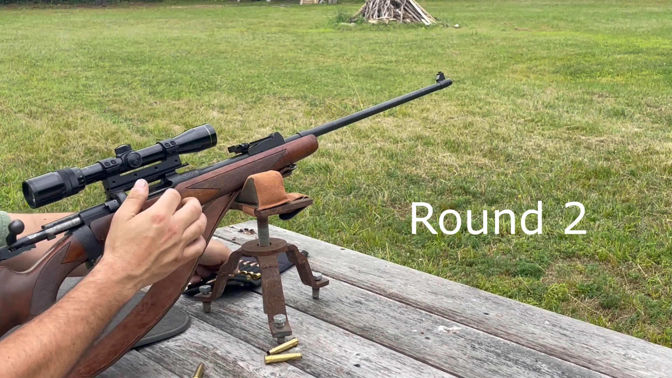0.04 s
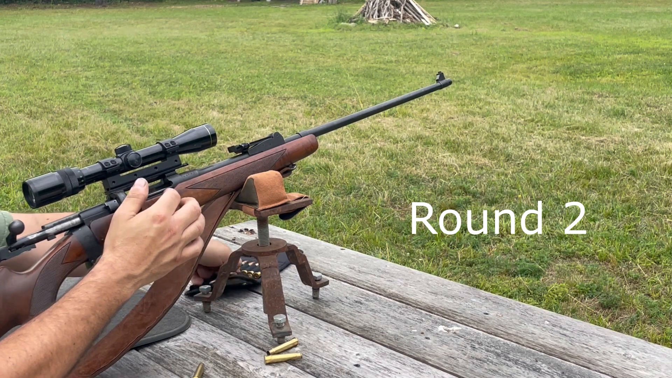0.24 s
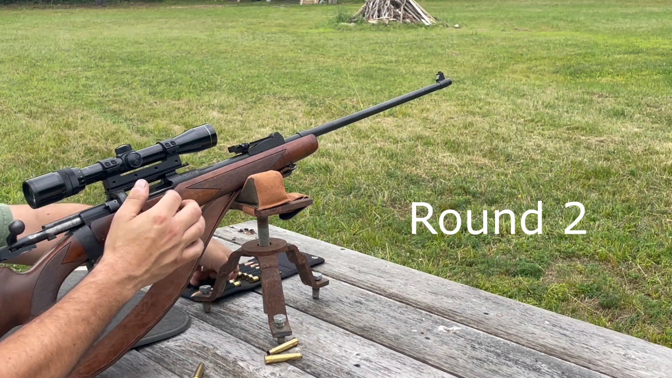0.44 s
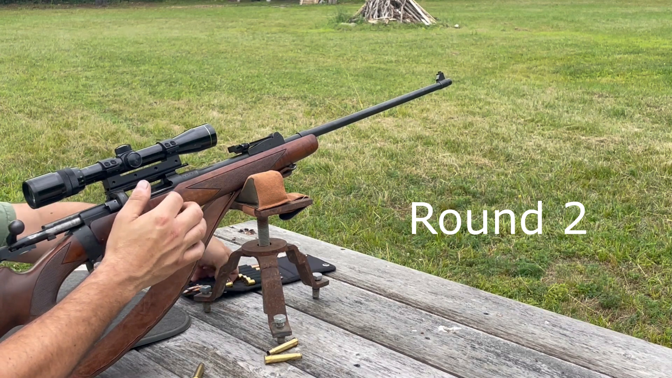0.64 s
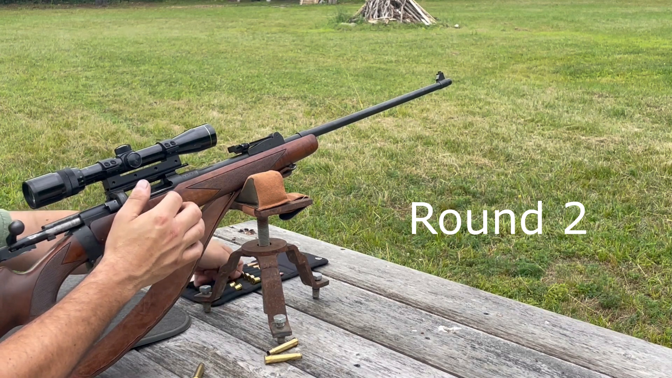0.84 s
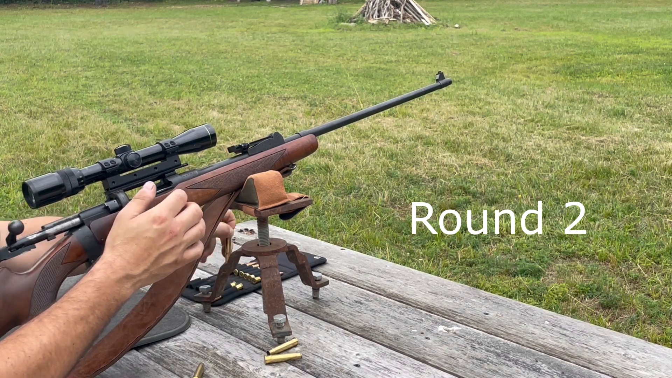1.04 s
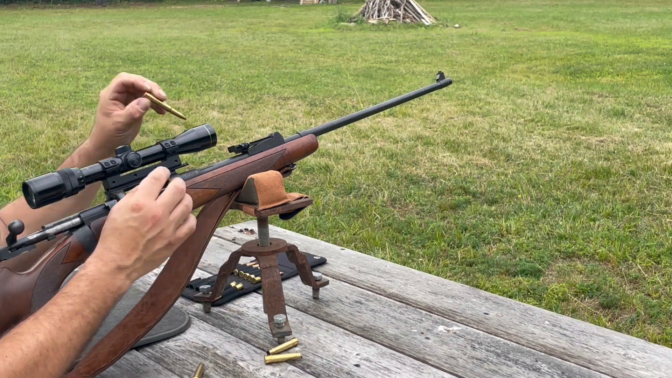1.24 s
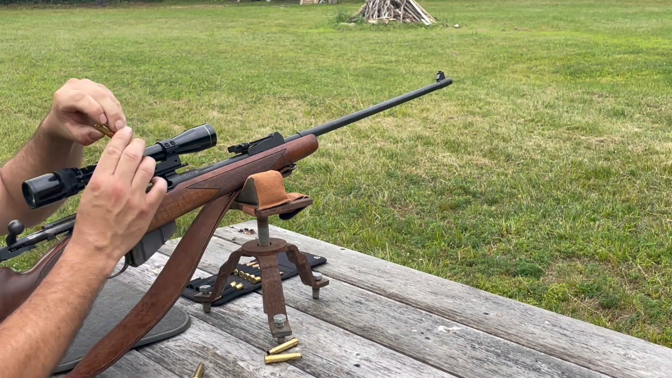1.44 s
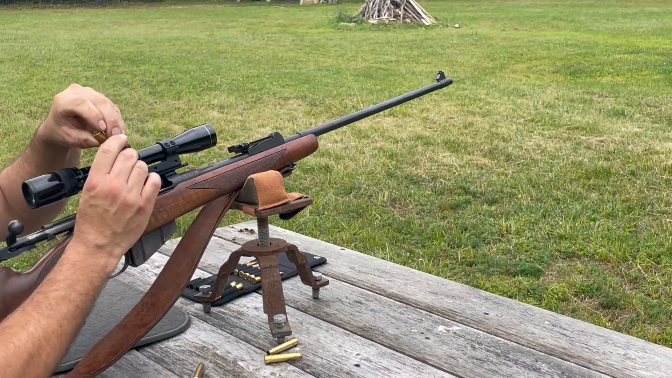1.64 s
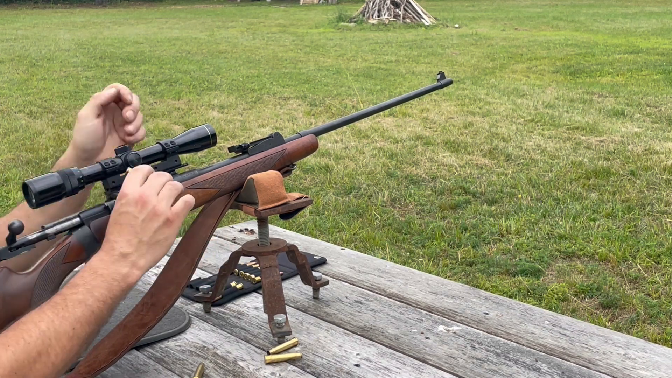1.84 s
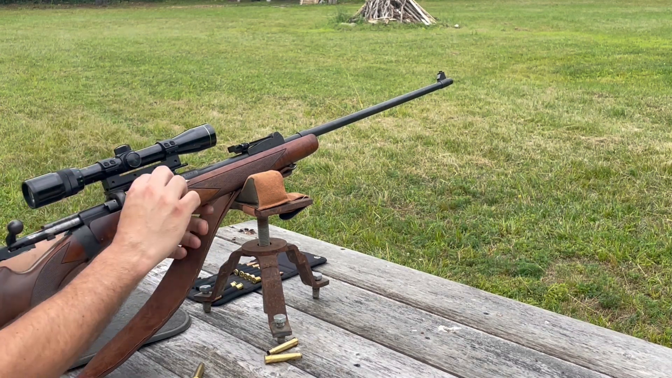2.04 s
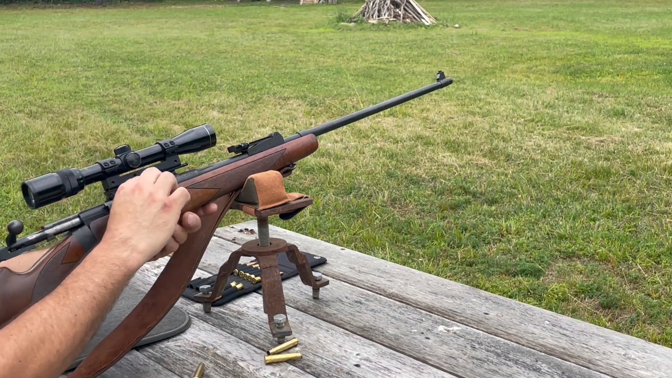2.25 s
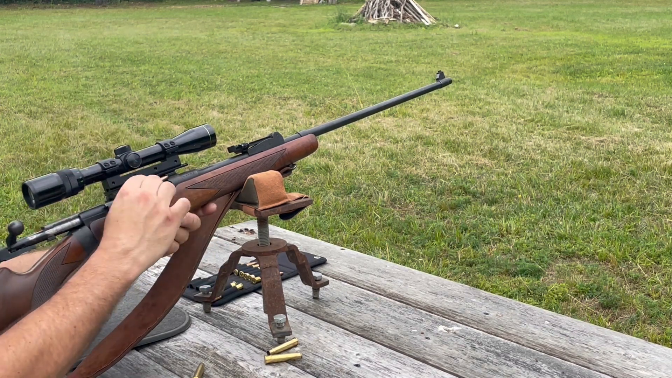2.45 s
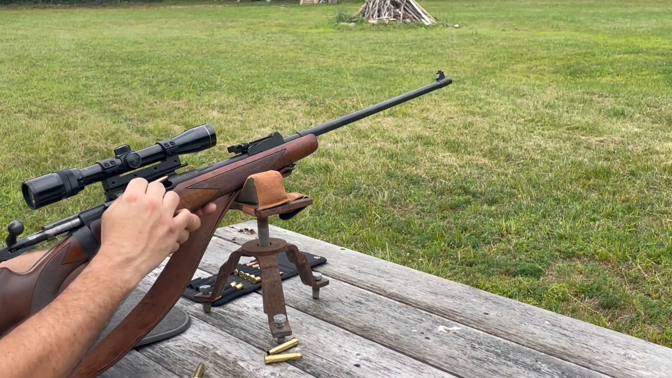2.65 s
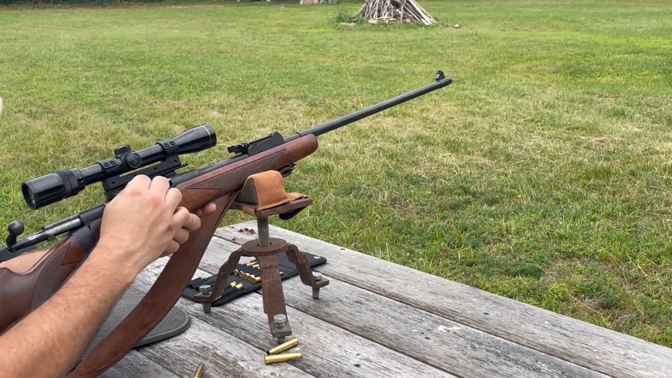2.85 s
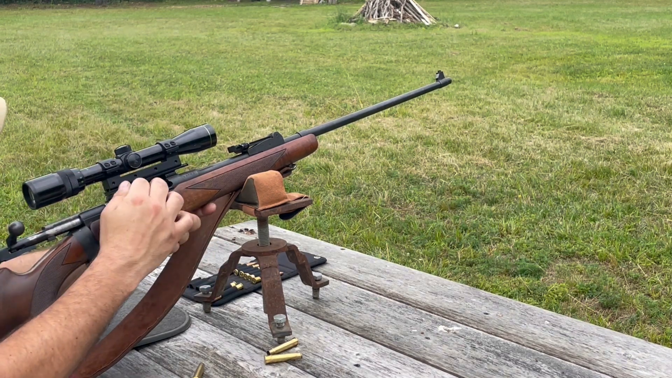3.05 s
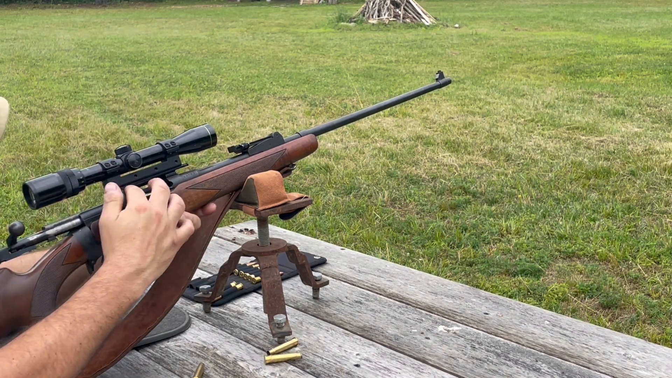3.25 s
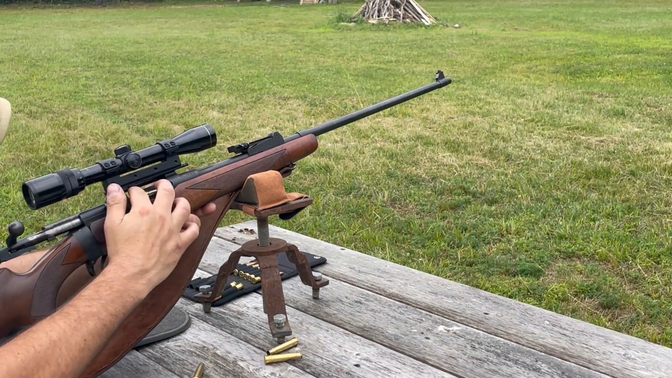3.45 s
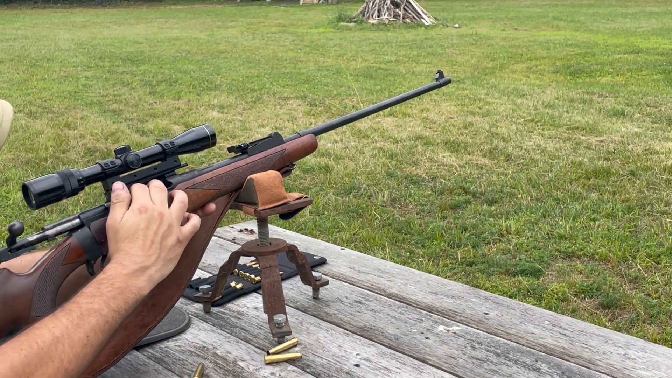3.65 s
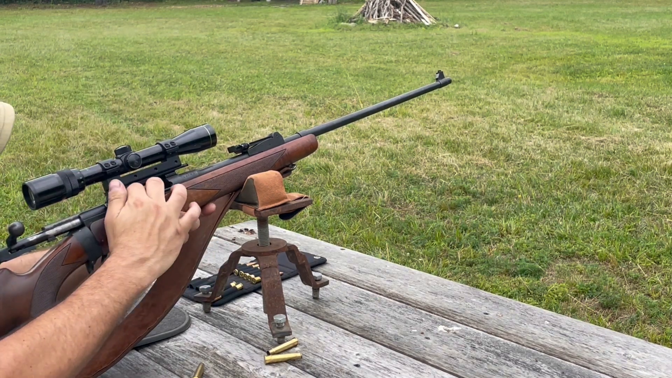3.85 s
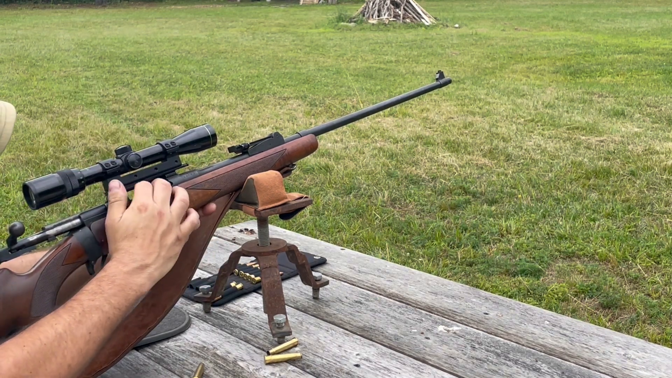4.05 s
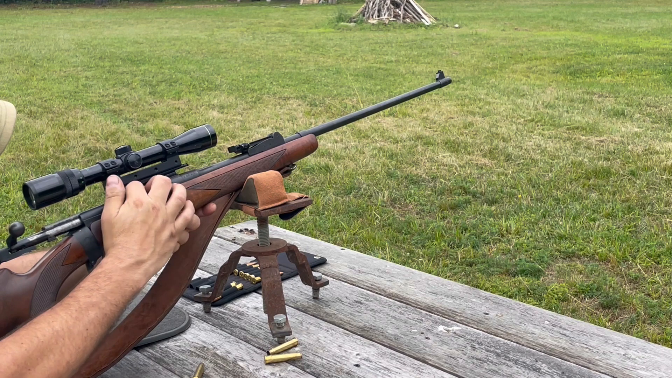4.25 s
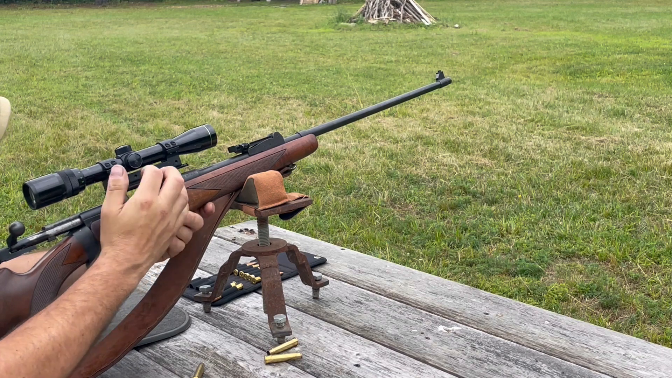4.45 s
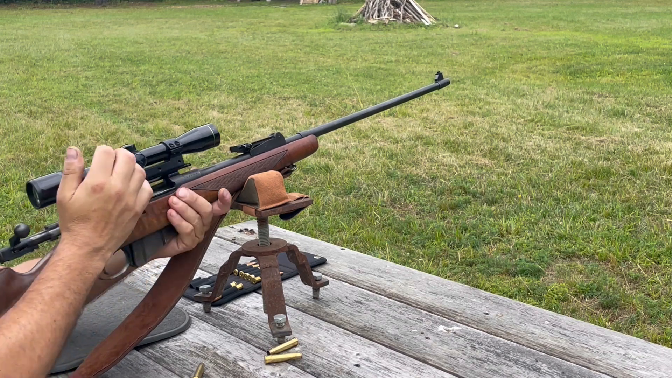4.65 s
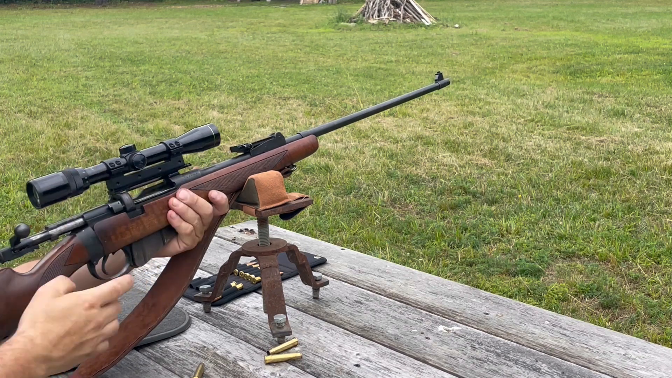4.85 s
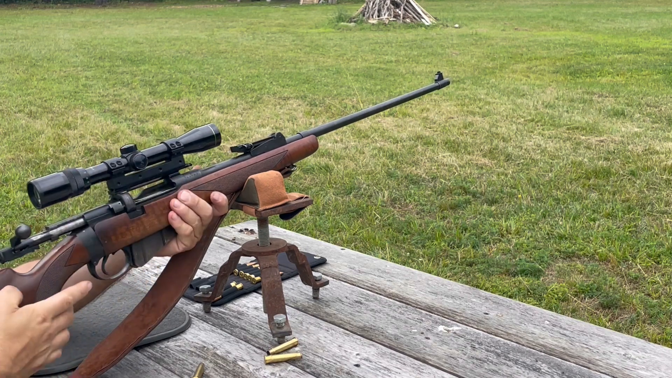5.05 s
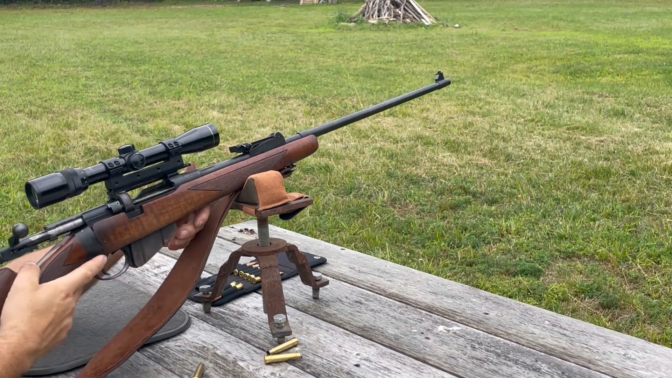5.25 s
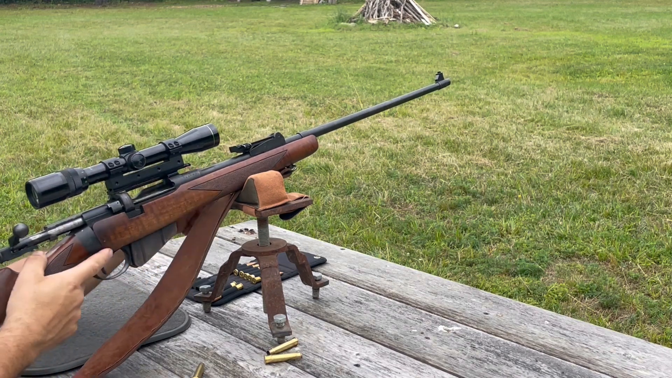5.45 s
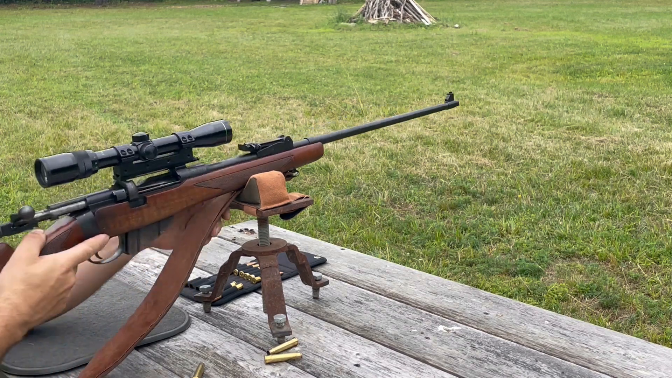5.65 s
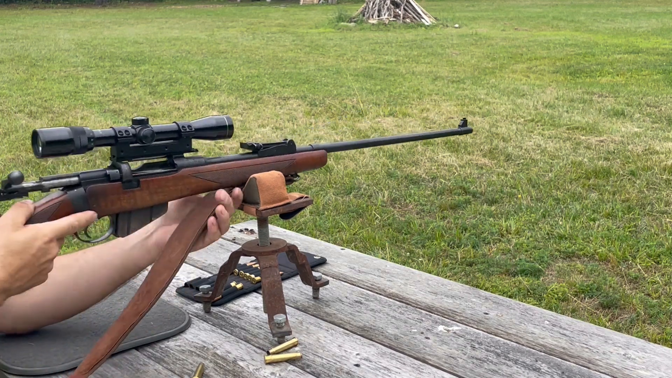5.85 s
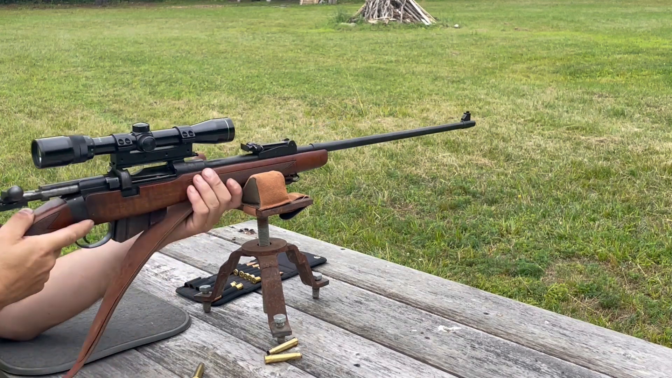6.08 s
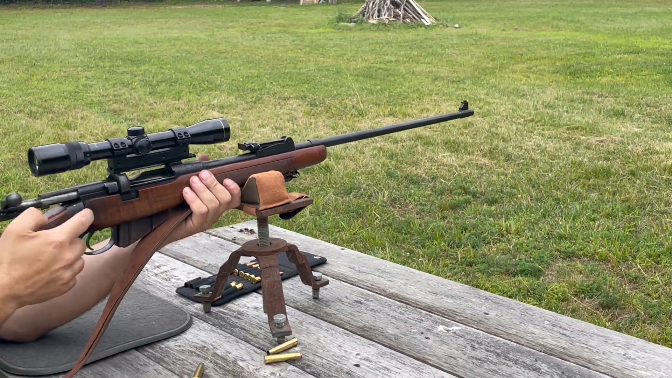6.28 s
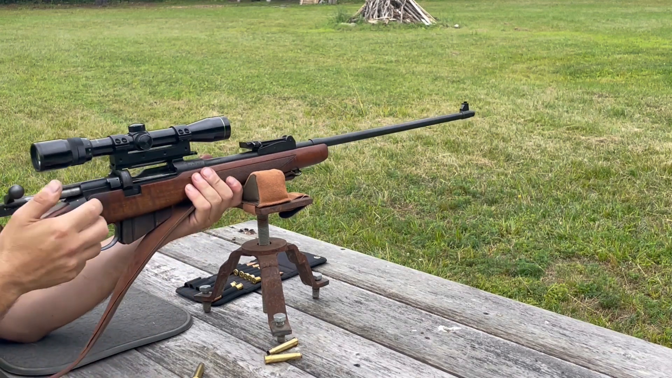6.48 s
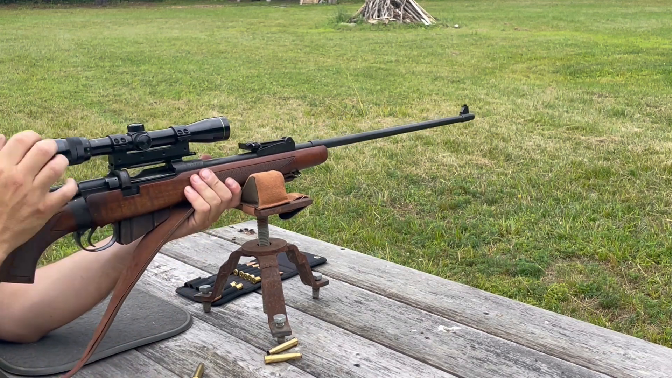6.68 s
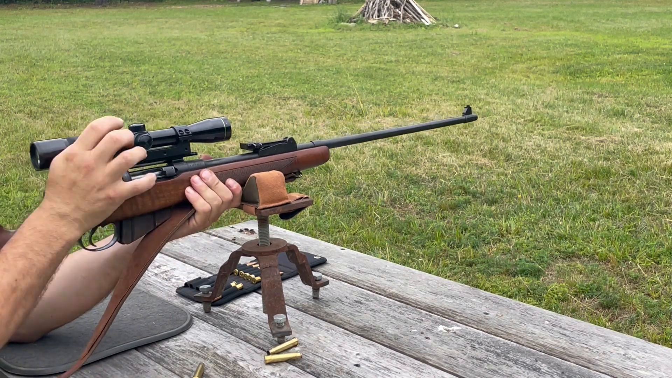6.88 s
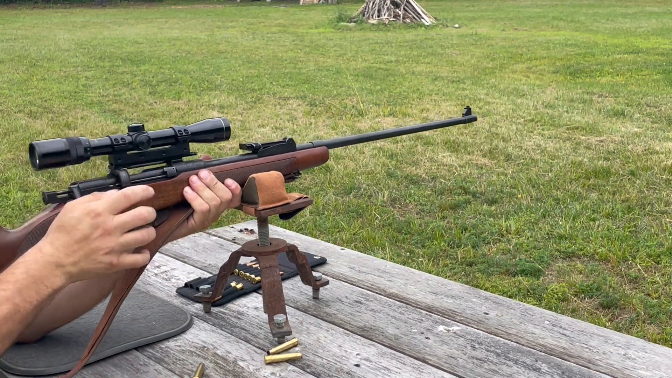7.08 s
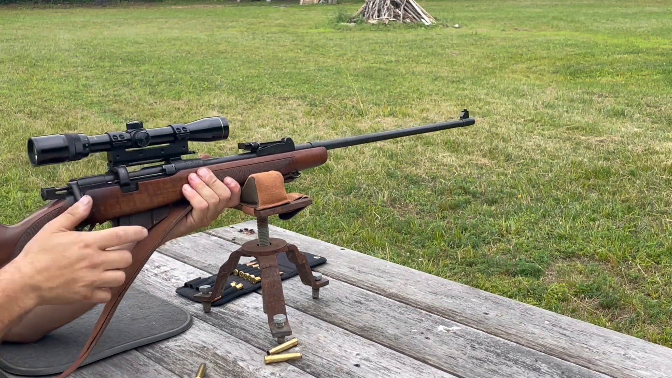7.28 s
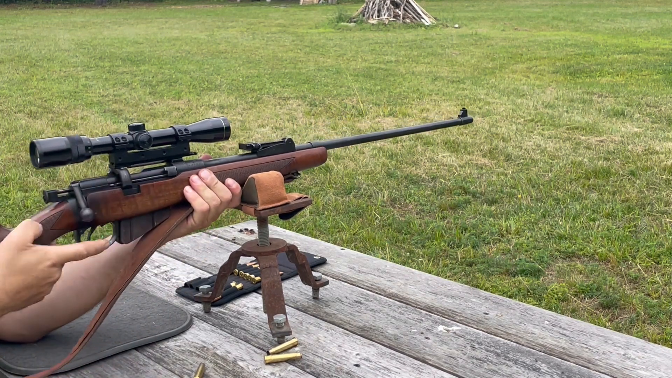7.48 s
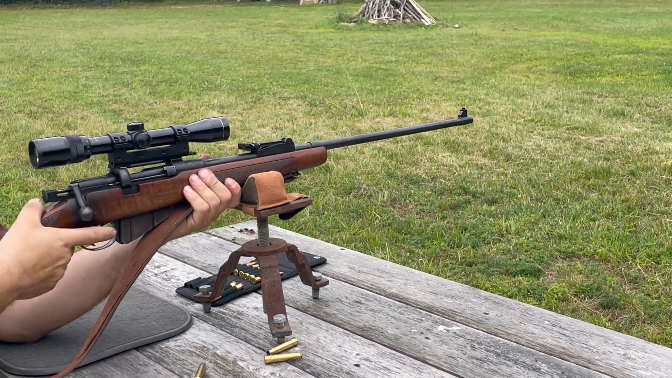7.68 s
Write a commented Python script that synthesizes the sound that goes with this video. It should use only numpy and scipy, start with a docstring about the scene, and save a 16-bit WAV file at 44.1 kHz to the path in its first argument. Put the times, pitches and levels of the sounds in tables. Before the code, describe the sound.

Small brass and steel clicks of a rifle being loaded, followed by wooden bench thumps and a loud bolt closing and locking.

```python
"""Rifle action: a cartridge is pressed into the magazine, then the bolt is run home and turned down.
Brass and steel strike and scrape, ringing the action's modes. Arm and bolt thump a wooden bench;
the leather sling creaks; skin and cloth rub. Behind: a far bird and faint outdoor rumble.
Picked up close by a phone with two microphone ports."""
import sys
import numpy as np
from scipy import signal
from scipy.fft import rfft, irfft
from scipy.io import wavfile

SR = 44100
rng = np.random.default_rng(int(sys.argv[2]) if len(sys.argv) > 2 else 0)


def inscribe(sig):
    """Save sig as 16-bit PCM at rate SR to the path in sys.argv[1].

    A 1-D sig is mono; a 2-D sig holds one channel per row.
    Samples are clipped to [-1, 1] before scaling.
    """
    pcm = np.round(np.clip(np.atleast_2d(sig).T, -1, 1) * 32767)
    wavfile.write(sys.argv[1], SR, pcm.astype(np.int16))


N = 340468
TIME_S = np.arange(N) / SR

# action modes (frequency [Hz], level [dB], t60 [s])
ACTION_MODES = [(430, -9, 0.016), (623, 1, 0.052), (958, -3, 0.03), (1146, -2, 0.037), (1190, -5, 0.021),
                (1556, -1, 0.038), (1940, -5, 0.049), (2110, 7, .024), (2255, 1, 0.039),
                (2700, -6.5, 0.038), (2900, -1, 0.01), (3197, -3, 0.04), (4480, -1, 0.039),
                (4940, -0.5, .03), (5050, -2.5, 0.035), (6360, -5.5, .024), (6800, -0.5, 0.028),
                (6880, -5, 0.01), (7400, -6, 0.035), (8500, -4.5, 0.039), (10250, -4, .018),
                (11700, -9.5, .018)]
# loose brass case modes (frequency [Hz], level [dB], t60 [s])
CASE_MODES = [(2880, -2, 0.07), (3100, 0, 0.041), (6200, -11.5, .035), (10920, 2.5, 0.028)]
# bolt and barrel modes, hand off the action (frequency [Hz], level [dB], t60 [s])
BARREL_MODES = [(878, -30.5, 0.14), (1230, -28.5, 0.1), (2363, 7, 0.05), (2350, -26.5, 0.153),
                (4400, -23, 0.092), (4980, -7.5, 0.036), (6401, -38, .22), (6670, 0.5, 0.026),
                (6880, -14.5, 0.057)]
# dense modes of the action (frequency [Hz], density [dB])
CLATTER_SPECTRUM = [(100, -36.5), (280, -14.5), (420, -5.5), (620, 4.5), (790, 0.5), (1100, 6), (1450, -7),
                    (2250, 4), (3500, -2), (5500, -2), (7000, -5.5), (11500, -13.5), (14000, -19.5),
                    (16000, -26.5)]
# contact colour bands (centre [Hz])
BAND_CENTRES_HZ = [600, 1100, 2100, 3200, 5500, 11000]
# colour shared by all contacts (frequency [Hz], level [dB])
CONTACT_COLOUR = [(600, -0.03), (1100, 3.5), (2100, 4.5), (3200, 4), (5500, 4.5), (11000, 0.13)]
# cartridge on receiver (time [s], level [dB], tilt [dB/oct], part pitch [Hz], resonance [dB])
CARTRIDGE_TAPS = [(2.1472, -65, -1.5, 1710, 21), (2.1872, -51, 2.5, 3030, 13), (2.1905, -48, 0.5, 2430, 13),
                  (2.2358, -57.0, 0, 2850, 14.5), (2.2437, -62, -0.5, 2700, 8),
                  (2.2494, -56.5, 0, 3370, 14.5), (2.3912, -53, 3.5, 2900, 20.5),
                  (2.403, -65, 1.5, 3250, 10), (2.5305, -72, -2.5, 3140, 21.5),
                  (2.8508, -41.5, 2.5, 2700, 2.5), (2.8645, -52.0, 4.5, 3470, 8),
                  (2.8755, -55, 0.5, 3250, 8), (2.9992, -51, 0.5, 2250, 1.5), (3.0264, -50.5, 1, 2550, 4),
                  (3.0398, -47.5, 0.5, 1000, 4.5), (3.0515, -60, -4, 3250, 1),
                  (3.0843, -64.5, -4.5, 1550, 7), (3.1015, -50.5, 4.5, 550, 14.5),
                  (3.116, -66, -3.0, 1100, 10), (3.1478, -65.0, -2, 2850, 14.5),
                  (3.1743, -64.5, -3, 3250, 7)]
# magazine and fittings (time [s], level [dB], tilt [dB/oct], part pitch [Hz], resonance [dB])
MAGAZINE_SNAPS = [(0.7373, -63.5, -4.5, 2000, 6.5), (0.7785, -65.5, -4.5, 1430, 11),
                  (2.0526, -71.5, 4, 3050, 9.5), (3.3684, -58, 2, 4030, 6.5), (3.3745, -60, -1, 1550, 9),
                  (3.4194, -68, 0.5, 3050, 6), (3.4326, -65, -4, 2250, 9), (3.4883, -56.5, -3.5, 2250, 4),
                  (3.6223, -55.5, -2.5, 1850, 4.5), (3.6428, -46.5, 2.0, 3270, 6.5),
                  (3.7173, -38, -1.5, 2700, 5.5), (3.783, -29, 2.5, 2110, 9), (3.9201, -59, -5, 1660, 7.5),
                  (4.152, -38, 0.0, 1454, 11), (4.223, -55, 1.0, 2140, 12), (4.3265, -45.5, 0.5, 1850, 8.5),
                  (4.66, -71, -2, 549, 10.5), (5.2628, -75.5, -7.5, 800, 8), (5.8832, -75, -6.5, 850, 9),
                  (5.9613, -69, -0.5, 1300, 9.5), (6.1856, -66.5, -3, 4650, 6), (6.2963, -66, 2, 4950, 7),
                  (7.179, -64.5, -10, 2600, 8), (7.1955, -68, 1.5, 4840, 7.5), (7.366, -67.5, 0.5, 3450, 2),
                  (7.445, -72, 2, 4400, 11.5)]
# bolt impacts (time [s], level [dB], tilt [dB/oct], part pitch [Hz], resonance [dB])
BOLT_BLOWS = [(6.7555, -55, 1.5, 2700, 9), (6.7647, -38, 4.5, 3050, 3), (6.7695, -35.5, -2, 2360, 9),
              (6.7886, -39, 1.5, 700, 13), (6.7993, -31.5, 6, 2100, 0.5), (6.8031, -33, 1, 597, 14),
              (6.8207, -30.5, 2, 3050, 0.5), (6.8325, -37.5, 3.5, 3230, 8), (6.8408, -35.5, 2, 554, 13),
              (6.8526, -45.5, -6.5, 2250, 11), (6.8677, -28, 3.0, 550, 7), (6.9074, -34, 0.5, 2570, 9),
              (6.9431, -61, 0.5, 4530, 12.5), (6.9965, -62, -6, 1300, 11), (7.0417, -27.5, 1.0, 590, 11),
              (7.0711, -58, -3.5, 11000, 15.5)]
# cartridge over magazine lips (start [s], length [s], level [dB], swell [dB])
CARTRIDGE_SCRAPES = [(2.245, 0.04, -46.5, 0), (2.39, 0.021, -46.5, -9), (2.81, 0.032, -55.5, -5.5),
                     (2.895, 0.024, -57.5, 1.5), (3.025, 0.19, -58, 1), (3.38, 0.062, -64.5, 9),
                     (3.488, 0.018, -51.5, 0.5), (3.714, .004, -50.5, 1), (3.748, 0.034, -57, 20.5),
                     (3.795, 0.056, -51.5, -9)]
# bolt gripped, run forward, turned down (start [s], length [s], level [dB], swell [dB])
BOLT_SLIDES = [(6.662, 0.059, -55.5, -2), (6.768, 0.033, -36, 12.5), (6.812, 0.045, -19, -8),
               (6.875, 0.075, -39.5, -20), (6.987, 0.11, -48, -12.5)]

# blows on the bench (time [s], level [dB], thud and slap against plank ring [dB])
BENCH_BUMPS = [(.74, -53, 7.5), (1.085, -57, 0.5), (5.262, -59.5, 6), (5.471, -62, -6), (5.883, -59, 3),
               (6.392, -40, 8), (6.402, -35.5, -5), (6.414, -41, 3), (6.436, -40.5, -8), (6.547, -37, 8.5),
               (6.555, -31, -6.5), (6.666, -49.5, -3.5), (6.868, -44, -6), (6.906, -34, -15),
               (6.991, -36.5, -3), (7.042, -40.5, 3), (7.179, -55, 6.5)]
# plank modes (frequency [Hz], level [dB], t60 [s])
PLANK_MODES = [(107, -1, 0.31), (146.8, -4, 0.45), (177.4, 2.5, 0.16), (219.5, -1, 0.17), (403.7, 6, 0.071),
               (506.5, 1, 0.091), (699, -5, 0.1)]
# bench thud (frequency [Hz], density [dB])
THUD_SPECTRUM = [(80, -16), (250, 5.5), (750, 0.5), (1000, -23), (2000, -21.5), (8000, -53.5)]
# bench slap (frequency [Hz], density [dB])
SLAP_SPECTRUM = [(300, -20.5), (1000, 0.5), (2600, 0), (3600, -11.5), (5500, -3.5), (7000, -23.5),
                 (16000, -32)]
# sling under strain (start [s], length [s], level [dB], swell [dB])
SLING_CREAKS = [(5.525, 0.15, -53, -17), (5.795, .005, -61.5, -3), (5.925, .05, -60, -3.5)]
# leather modes (frequency [Hz], level [dB], t60 [s])
LEATHER_MODES = [(468, -1.5, 0.024), (870, -6, 0.026), (1440, -2, 0.012), (2020, -1.5, 0.014),
                 (2430, 3, 0.016), (3680, -12.5, .01)]
# skin and cloth on the rifle (start [s], length [s], hiss [dB], stock murmur [dB])
HAND_RUBS = [(0.1, 0.075, -70, -72), (0.378, 0.028, -54, -53), (0.442, 0.12, -57.5, -62),
             (0.688, 0.06, -59.5, -61.5), (0.86, 0.1, -67, -65), (1.08, 0.038, -86, -70.5),
             (1.99, .06, -66.5, -65.5), (5.112, 0.27, -72.5, -84), (5.183, 0.019, -62.5, -81),
             (5.493, .13, -64.5, -63), (5.743, 0.28, -70, -72), (6.176, 0.24, -65, -66.5)]
# skin and cloth hiss (frequency [Hz], density [dB])
CLOTH_SPECTRUM = [(700, -29), (1600, -4), (2600, 2.5), (5000, -2), (7000, -6.5), (9500, -15.5),
                  (13500, -20.5), (15000, -36)]
# wooden stock murmur (frequency [Hz], density [dB])
STOCK_SPECTRUM = [(100, -10), (350, 1), (600, -3), (900, 2.5), (1450, -2), (2000, -4), (5000, -29)]
# sleeve movements (start [s], length [s], level [dB], swell [dB])
SLEEVE_SWISHES = [(5.1, 0.11, -73.5, 4), (5.52, 0.46, -75, 2.5), (6.22, .14, -75, 3)]
# sleeve hiss (frequency [Hz], density [dB])
SLEEVE_SPECTRUM = [(1500, -16), (6000, -1), (13500, 0), (15000, -23)]

# bird notes (time [s], length [s], start pitch [Hz], end pitch [Hz], level [dB])
BIRD_NOTES = [(0.127, 0.053, 3200, 2870, -76), (1.764, 0.091, 3220, 2510, -66),
              (1.822, 0.053, 3530, 3150, -61), (1.87, .07, 2950, 2300, -67),
              (3.272, 0.071, 1884, 2340, -63.5), (6.6, 0.032, 2940, 2780, -62)]
# outdoor rumble and microphone hiss (frequency [Hz], density [dB])
AIR_SPECTRUM = [(20, -37), (32, -16), (50, 0), (75, 2.5), (130, -6), (250, -18), (450, -17), (1000, -22),
                (1600, -27), (2300, -24), (4800, -29.5), (7000, -34.5), (9000, -23), (10200, -49.5),
                (12000, -50.5), (15500, -62.5)]
# likeness of that noise at the two ports (frequency [Hz], correlation [0..1])
AIR_CORRELATION = [(60, 0.98), (130, 0.9), (300, .7), (700, 0.12), (1400, 0.26), (2500, 1), (15000, 0.95)]
# port phase (frequency [Hz], left lead [rad])
PORT_PHASE = [(200, 0), (780, .35), (2100, .1), (5200, .05), (6100, -.25), (7240, -1.5), (8150, -3.14),
              (10200, -5.2), (12700, -7), (13900, -8.9), (16000, -9.5)]
# port balance (frequency [Hz], left minus right [dB])
PORT_BALANCE = [(250, 0.5), (600, 1.5), (900, 4), (1300, 4.5), (1750, 3.5), (2200, 4), (3000, 1.15),
                (5000, 1)]


def cartridge():
    """The loose cartridge taps the receiver and scrapes the magazine lips; its case rings."""
    taps = clicks(CARTRIDGE_TAPS, CASE_MODES, graze_db=-34, rise_s=0.0014, chatter_s=0.0034, t60_s=0.012)
    return taps + slide(CARTRIDGE_SCRAPES, CASE_MODES)


def magazine():
    """Magazine and fittings snap, damped by the hand."""
    return clicks(MAGAZINE_SNAPS, [], graze_db=-22, rise_s=0.0027, chatter_s=0.003, t60_s=0.016)


def bolt():
    """The bolt slides and slaps along its raceway, stops and locks; the barrel rings."""
    blows = clicks(BOLT_BLOWS, BARREL_MODES, graze_db=-35, rise_s=0.0016, chatter_s=0.004, t60_s=0.014)
    return blows + slide(BOLT_SLIDES, BARREL_MODES)


def steel(t, free_modes, clatter_db, t60_s, chatter_s):
    """One blow: action and free parts ring; clatter holds while the faces chatter, then dies in t60_s."""
    fall_db = 60 * np.maximum(t - chatter_s, 0) / t60_s
    clatter = tinted(rng.standard_normal(len(t)), CLATTER_SPECTRUM) * amp(clatter_db - fall_db)
    return ring(ACTION_MODES + free_modes, t, spread_db=4.0) + clatter


def clicks(rows, free_modes, graze_db, rise_s, chatter_s, t60_s):
    """Metal impacts: a light graze, then full contact; the struck part adds its resonance."""
    size, lead_s, graze_s, span_s = 8192, 0.004, 0.0025, 0.01
    pivot_hz, part_width_oct = 2500, 0.42
    hz, centres_hz = bins(size), np.array(BAND_CENTRES_HZ)
    bands = np.array([lookup(list(zip(centres_hz, row)), hz) for row in np.eye(len(centres_hz))])
    out = np.zeros(N)

    def contact(at_s):
        t = np.maximum(np.arange(size) / SR - at_s, 0)
        onset = np.minimum(t / rise_s, 1) ** 1.6
        return onset * steel(t, free_modes, clatter_db=10.5, t60_s=t60_s, chatter_s=chatter_s)

    for time_s, db, tilt_db_oct, part_hz, part_db in rows:
        offset_oct = np.log2((hz + 1) / part_hz)
        resonance = amp(part_db * np.exp(-0.5 * (offset_oct / part_width_oct) ** 2))
        spectrum = resonance * rfft(amp(graze_db) * contact(lead_s - graze_s) + contact(lead_s))
        spectrum *= hz ** 4 / (hz ** 4 + 370 ** 4)  # contacts carry little bass
        colour_db = lookup(CONTACT_COLOUR, centres_hz) + tilt_db_oct * np.log2(centres_hz / pivot_hz)
        colour_db += 10 * np.log10(bands @ resonance ** 2 / bands.sum(1))
        for _ in range(2):  # set band levels; fine detail stays random
            power = bands @ abs(spectrum) ** 2 * 2 / (size * span_s * SR)
            spectrum *= amp((db + colour_db - 10 * np.log10(power)) @ bands)
        add(out, time_s - lead_s, irfft(spectrum, size))
    return out


def slide(rows, free_modes):
    """Sliding metal: tiny slips ring the action; a light touch is duller."""
    t, scrape = np.arange(4096) / SR, np.zeros(N)
    for _ in range(4):
        catches = slips(per_s=600)
        blow = steel(t, free_modes, clatter_db=15, t60_s=0.014, chatter_s=0.0018)
        scrape += unit(signal.oaconvolve(catches, blow)[:N])
    force = strokes(rows, attack_s=0.017, release_s=0.03)
    hardness = np.interp(20 * np.log10(force + 1e-9), [-42, -28], [0, 1])
    soft = tinted(scrape, [(1200, -2.0), (3000, 0), (6000, -4.5), (12000, -13)])
    firm = tinted(scrape, [(2500, -2.5), (6000, 1), (12500, 6), (15000, -13.0)])
    return (hardness * firm + (1 - hardness) * soft) * force * amp(0.6 * wander(per_s=240))


def bench():
    """Arm or bolt jolt thumps the planks: brief slap, dull thud, low ring."""
    thud_t60_s, slap_t60_s, rise_s = 0.12, 0.035, 0.0038
    t, out = np.arange(16384) / SR, np.zeros(N)
    press = 1 - np.exp(-t / rise_s)
    for time_s, db, thud_db in BENCH_BUMPS:
        thud = tinted(rng.standard_normal(len(t)), THUD_SPECTRUM) * amp(thud_db - 60 * t / thud_t60_s)
        slap = tinted(rng.standard_normal(len(t)), SLAP_SPECTRUM)
        slap *= amp(thud_db - 1.5 - 60 * t / slap_t60_s)
        planks = 0.59 * ring(PLANK_MODES, t, spread_db=3.5)
        add(out, time_s, amp(db) * press * (planks + thud + slap))
    return out


def sling():
    """Strained leather creaks in uneven, well damped slips."""
    t = np.arange(2048) / SR
    creak = sum(signal.oaconvolve(row, ring(LEATHER_MODES, t, spread_db=4.0))[:N]
                for row in slips(per_s=70, shape=(3, N)))
    return unit(creak) * strokes(SLING_CREAKS, attack_s=0.05, release_s=0.036)


def rubbing():
    """Skin and cloth hiss on the rifle, the stock murmurs, a sleeve swishes."""
    cloth_rows = [(start_s, length_s, db, 0) for start_s, length_s, db, _ in HAND_RUBS]
    stock_rows = [(start_s, length_s, db, 0) for start_s, length_s, _, db in HAND_RUBS]
    cloth = friction(cloth_rows, CLOTH_SPECTRUM, grain=0.64, uneven_db=1.6)
    stock = friction(stock_rows, STOCK_SPECTRUM, grain=0.56, uneven_db=2.7)
    sleeve = friction(SLEEVE_SWISHES, SLEEVE_SPECTRUM, grain=0.4, uneven_db=2.9)
    return cloth + stock + sleeve


def friction(rows, colour, grain, uneven_db):
    """Soft contact: hiss with tiny slips under each stroke."""
    catches = unit(slips(per_s=220))
    hiss = tinted(rng.standard_normal(N) + grain * catches, colour)
    return hiss * strokes(rows, attack_s=0.12, release_s=0.1) * amp(uneven_db * wander(per_s=85))


def bird():
    """Short gliding, fluttering whistles."""
    flutter_db = 2.5
    out = np.zeros(N)
    for time_s, length_s, start_hz, end_hz, db in BIRD_NOTES:
        hz = np.linspace(start_hz, end_hz, int(length_s * SR))
        hz *= 1 + 0.029 * wander(per_s=337)[:len(hz)]
        whistle = np.sqrt(2) * np.sin(2 * np.pi * np.cumsum(hz) / SR)
        add(out, time_s, amp(db) * np.hanning(len(hz)) * whistle)
    return out * amp(flutter_db * wander(per_s=71))


def air():
    """Rumble alike in both ports, diffuse middle, thin hiss."""
    level_db = -56.5
    left, independent = rfft(rng.standard_normal((2, N)))
    correlation = np.clip(lookup(AIR_CORRELATION, bins(N)), -1, 1)
    right = correlation * left + np.sqrt(1 - correlation ** 2) * independent
    pair = irfft(np.array([left, right]), N)
    return tinted(pair, AIR_SPECTRUM) * amp(level_db + 0.5 * wander(per_s=1.3))


def scatter(x, wet_db, t60_s):
    """Diffuse stereo reflections off bench, shooter and lawn."""
    t = np.arange(16384) / SR
    colour = [(150, 4.0), (1000, -2.0), (4000, -7), (8000, -13.5), (15000, -13)]
    tail = tinted(rng.standard_normal((2, len(t))), colour)
    tail *= amp(-60 * t / t60_s) * (1 - np.exp(-t / 0.012))
    return amp(wet_db) * signal.oaconvolve(x[None], tail / np.linalg.norm(tail[0]), axes=1)[:, :N]


def ring(modes, t, spread_db):
    """Decaying modes; each blow lands elsewhere, so their shares vary."""
    hz, db, t60_s = np.transpose(modes)[:, :, None]
    share_db = spread_db * rng.standard_normal(hz.shape)
    tones = np.sin(2 * np.pi * (hz * t + rng.random(hz.shape)))
    return (amp(db + share_db - 60 * t / t60_s) * tones).sum(0)


def strokes(rows, attack_s, release_s):
    """Gain: each stroke fades in, swells or sags while held, fades out."""
    gain = np.zeros(N)
    for start_s, length_s, db, swell_db in rows:
        age_s = TIME_S - start_s
        progress = np.clip(age_s / length_s, 0, 1)
        edges = np.clip(np.minimum(1 + age_s / attack_s, 1 - (age_s - length_s) / release_s), 0, 1)
        gain = np.maximum(gain, edges ** 2 * amp(db + swell_db * progress))
    return gain


def slips(per_s, shape=N):
    """Sparse random impulses."""
    return rng.standard_normal(shape) * (rng.random(shape) < per_s / SR)


def wander(per_s):
    """Smooth random motion, rms 1."""
    knots = rng.standard_normal(4096)
    return unit(np.interp(TIME_S * per_s, np.arange(len(knots)), knots))


def tinted(x, points):
    """x filtered by (frequency [Hz], gain [dB]) points, rms 1."""
    size = x.shape[-1]
    return unit(irfft(rfft(x) * amp(lookup(points, bins(size))), size))


def lookup(points, hz):
    """Table interpolated over log frequency."""
    points_hz, values = np.transpose(points)
    return np.interp(np.log(hz + 1), np.log(points_hz + 1), values)


def amp(db):
    return 10 ** (np.asarray(db) / 20)


def unit(x):
    return x / np.sqrt(np.mean(x ** 2) + 1e-20)


def bins(size):
    return np.fft.rfftfreq(size, 1 / SR)


def add(mix, time_s, sound):
    part = mix[max(round(time_s * SR), 0):][:len(sound)]
    part += sound[:len(part)]


def scene():
    """Rifle close by, direct plus weak scatter; far bird as scatter only; open air."""
    near = cartridge() + magazine() + bolt() + bench() + rubbing() + sling()
    sides = np.array([[0.5], [-0.5]])
    direct = irfft(rfft(near) * amp(sides * lookup(PORT_BALANCE, bins(N))), N)
    far = scatter(bird(), wet_db=0.0, t60_s=0.13)
    return direct + scatter(near, wet_db=-33.0, t60_s=0.32) + far + air()


def record(dry):
    """Ports part in phase in the treble; the loudest peaks are softly rounded; the phone's treble ends in a
    low-pass."""
    knee, ceiling, cutoff_hz = 0.65, 0.9, 16300
    sides = np.array([[0.5], [-0.5]])
    ported = irfft(rfft(dry) * np.exp(1j * sides * lookup(PORT_PHASE, bins(N))), N)
    linear, headroom = np.clip(ported, -knee, knee), ceiling - knee
    rounded = linear + headroom * np.tanh((ported - linear) / headroom)
    lowpass = signal.firwin(255, cutoff_hz, window=("kaiser", 9), fs=SR)
    return signal.oaconvolve(rounded, lowpass[None], "same")


dry = scene()
out = record(dry)
inscribe(out)
```